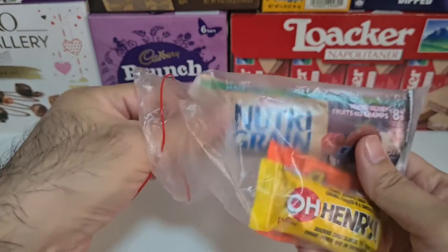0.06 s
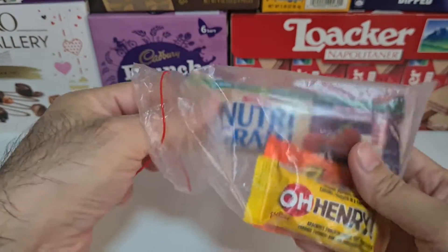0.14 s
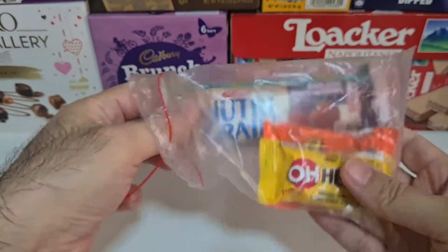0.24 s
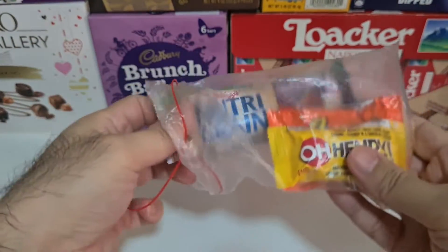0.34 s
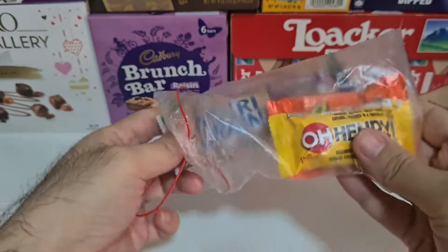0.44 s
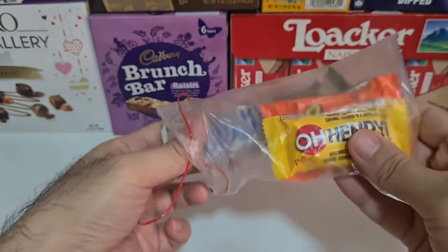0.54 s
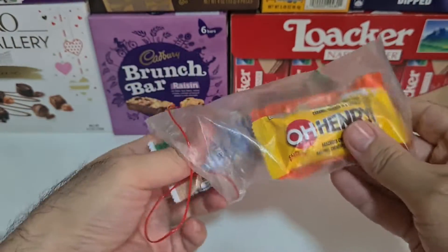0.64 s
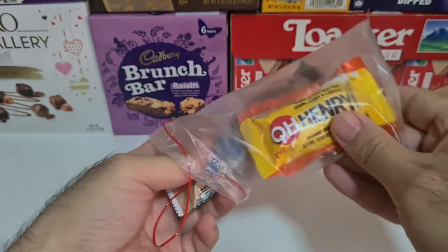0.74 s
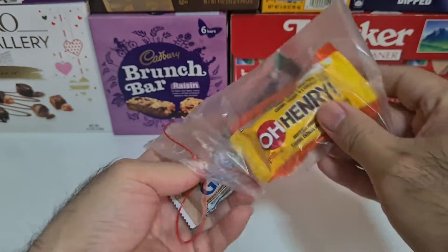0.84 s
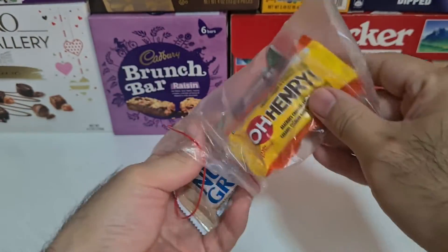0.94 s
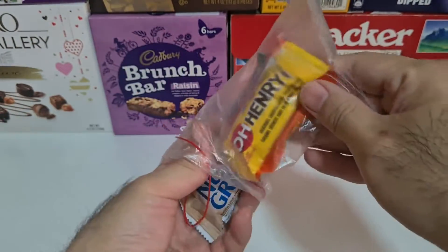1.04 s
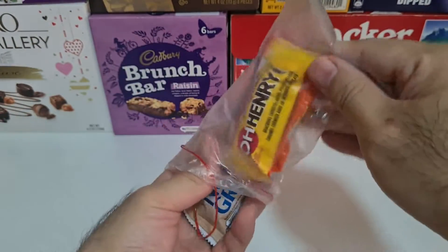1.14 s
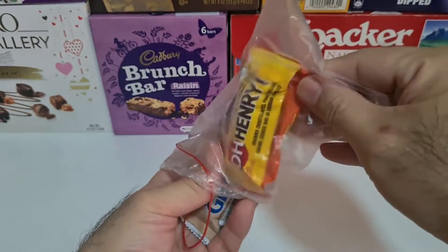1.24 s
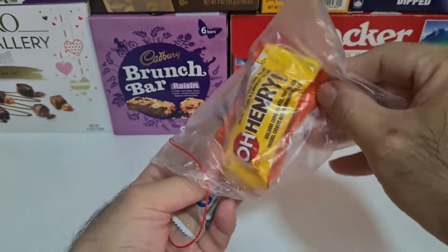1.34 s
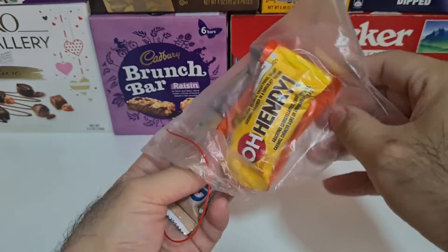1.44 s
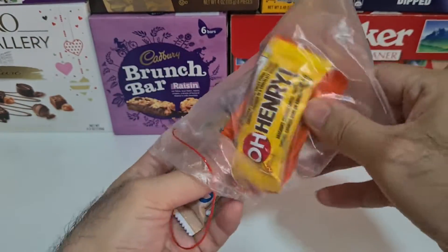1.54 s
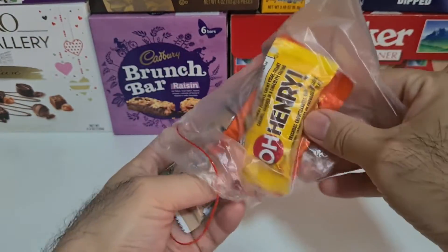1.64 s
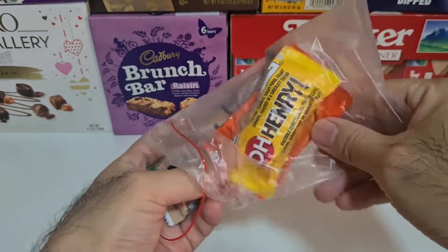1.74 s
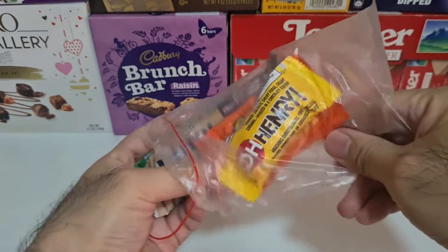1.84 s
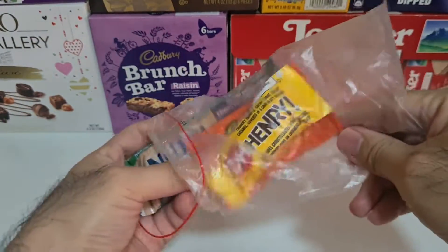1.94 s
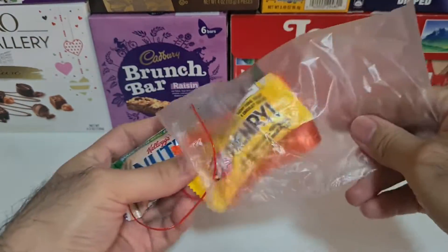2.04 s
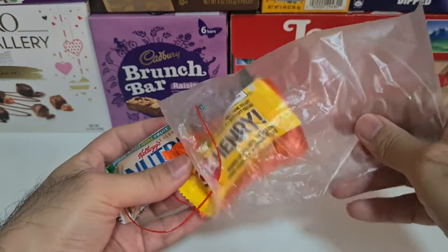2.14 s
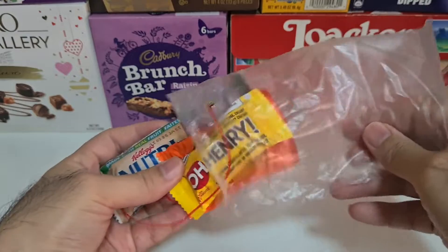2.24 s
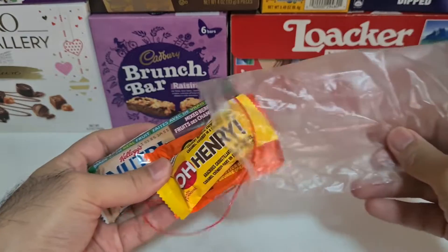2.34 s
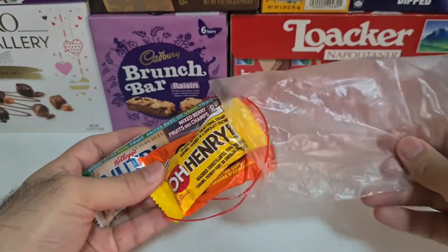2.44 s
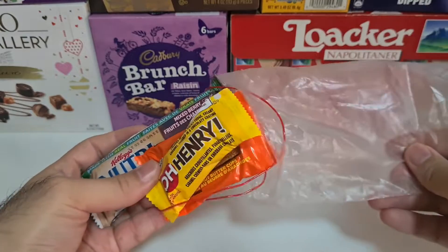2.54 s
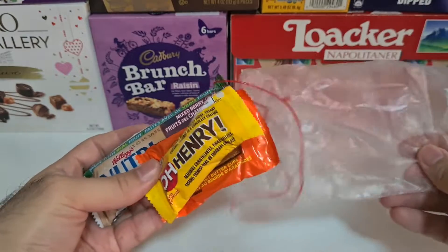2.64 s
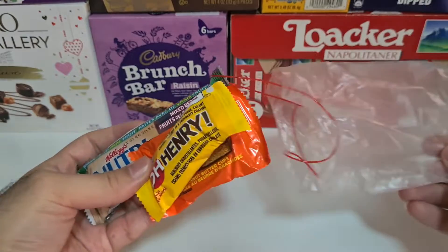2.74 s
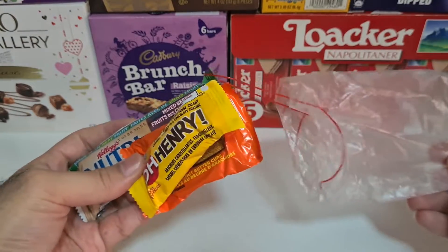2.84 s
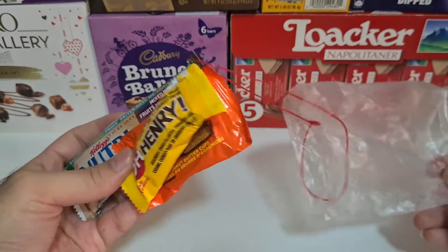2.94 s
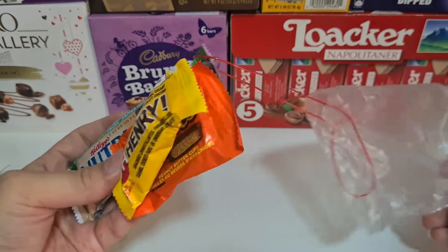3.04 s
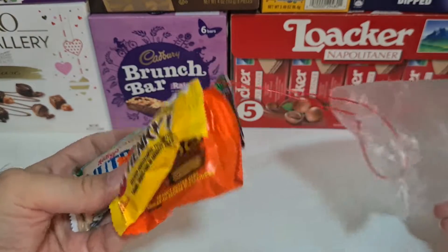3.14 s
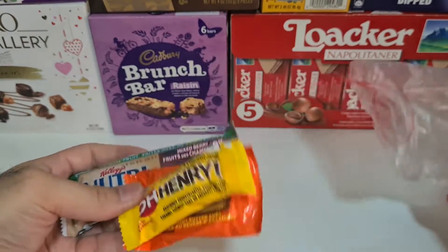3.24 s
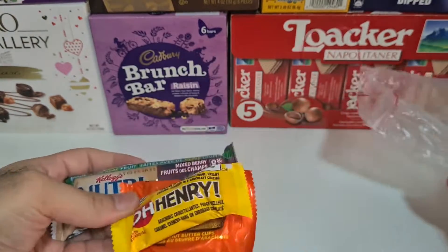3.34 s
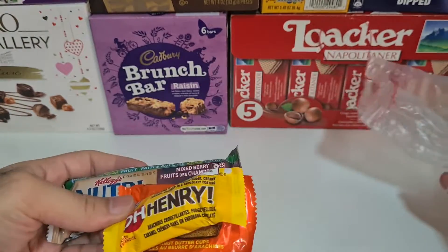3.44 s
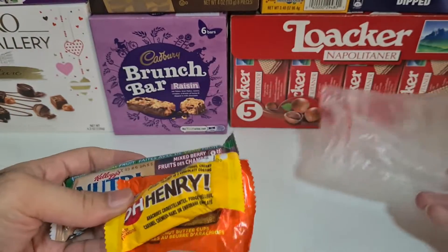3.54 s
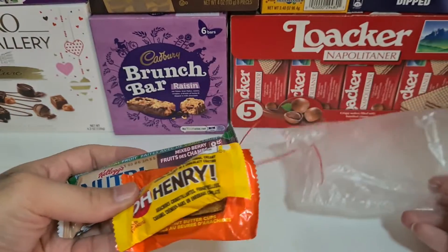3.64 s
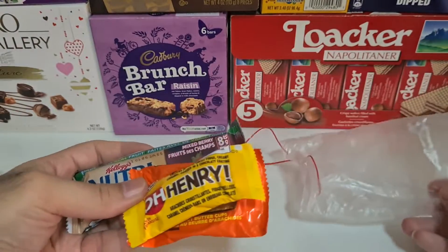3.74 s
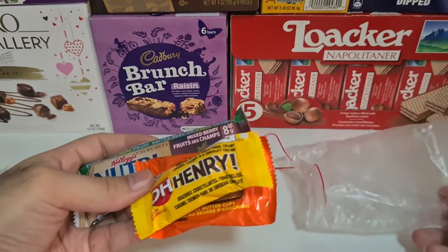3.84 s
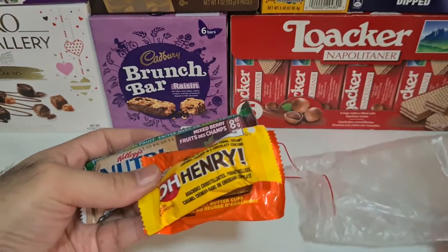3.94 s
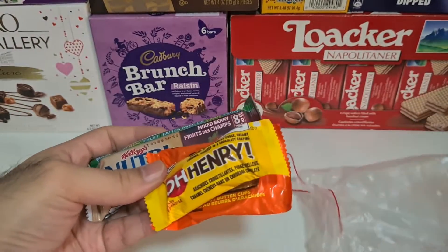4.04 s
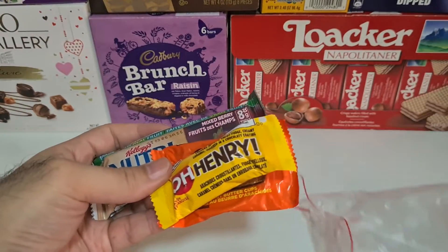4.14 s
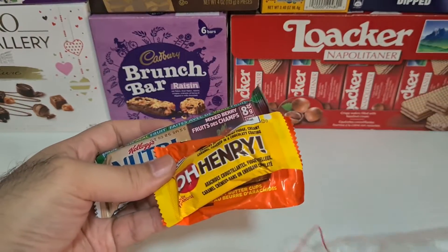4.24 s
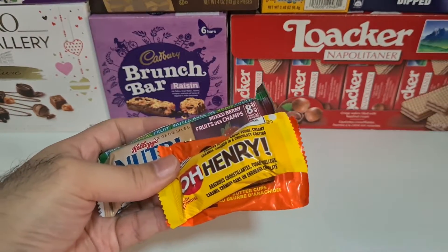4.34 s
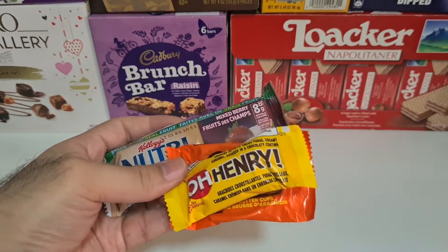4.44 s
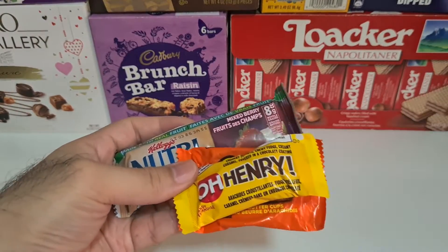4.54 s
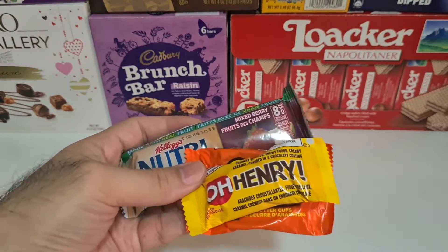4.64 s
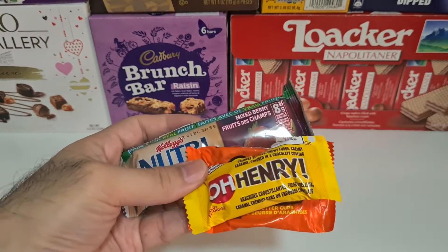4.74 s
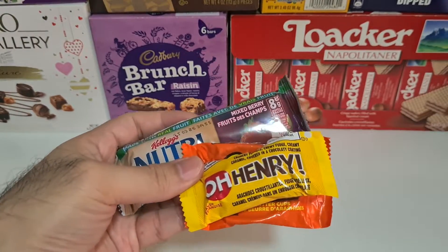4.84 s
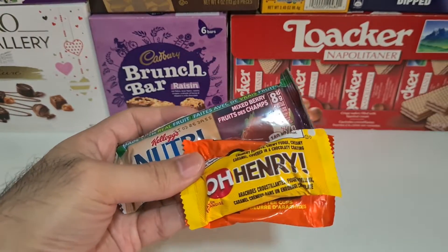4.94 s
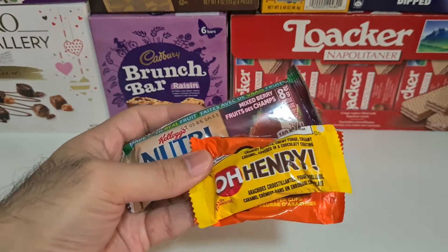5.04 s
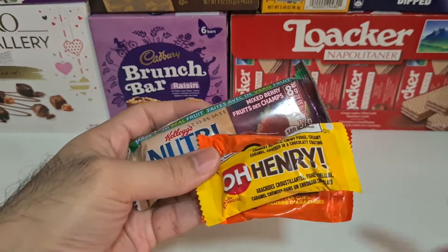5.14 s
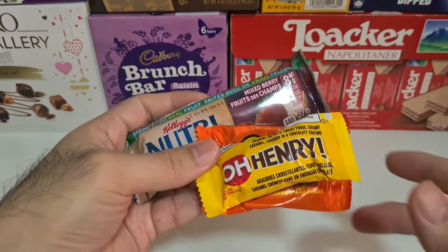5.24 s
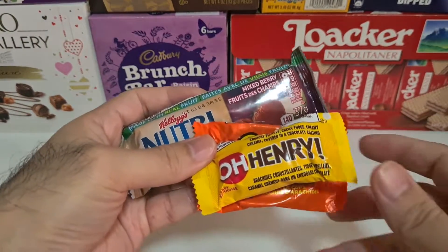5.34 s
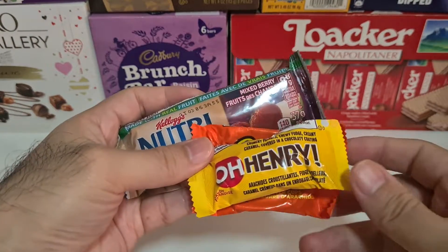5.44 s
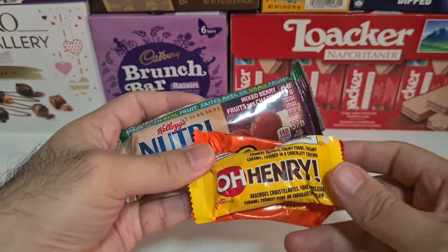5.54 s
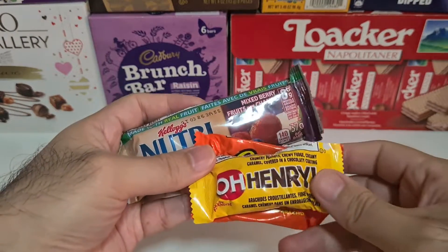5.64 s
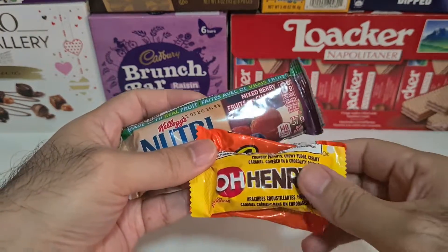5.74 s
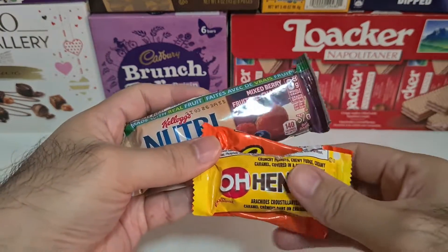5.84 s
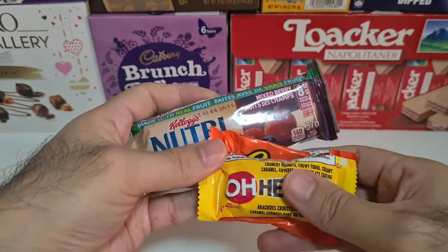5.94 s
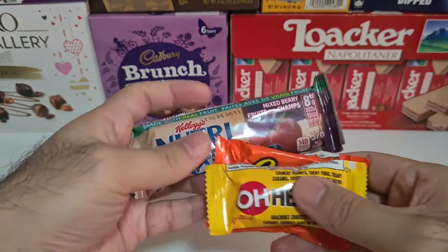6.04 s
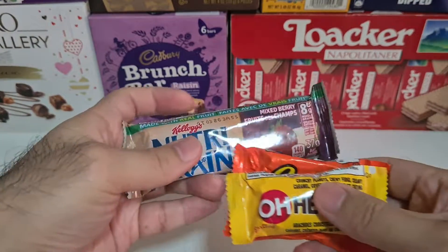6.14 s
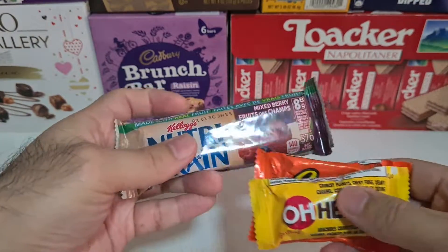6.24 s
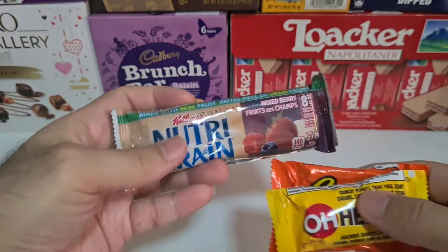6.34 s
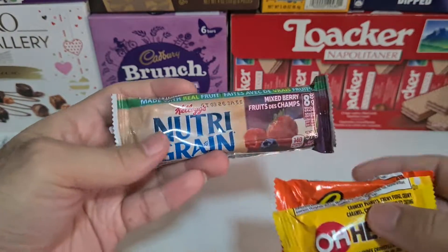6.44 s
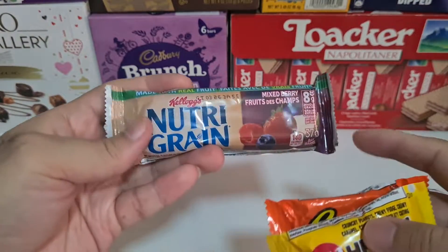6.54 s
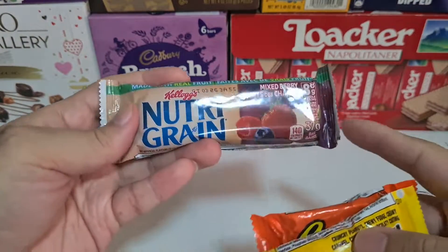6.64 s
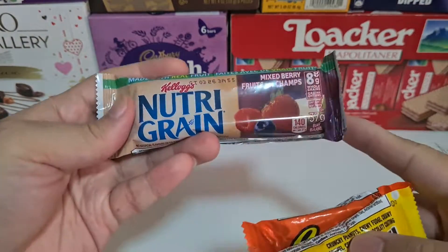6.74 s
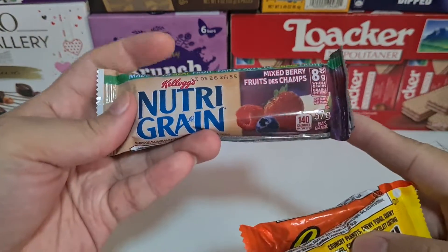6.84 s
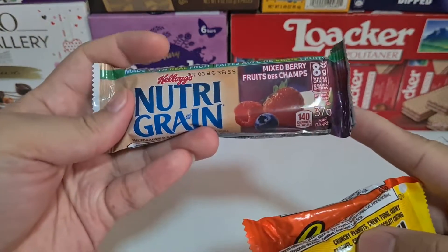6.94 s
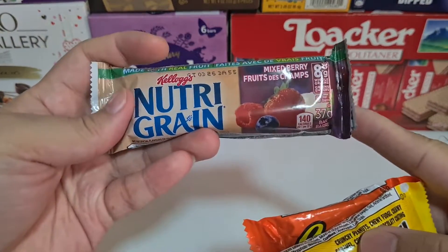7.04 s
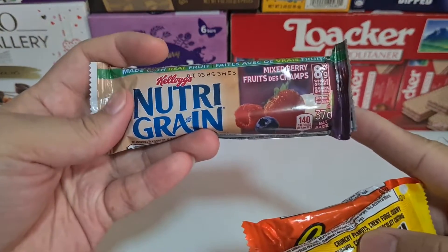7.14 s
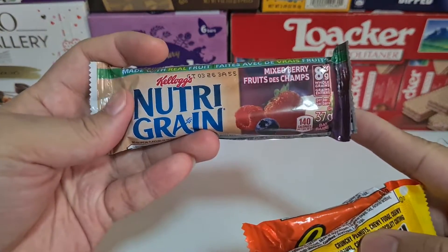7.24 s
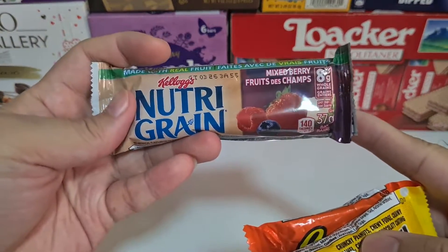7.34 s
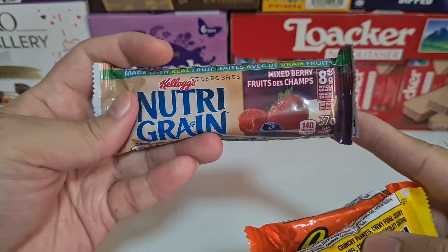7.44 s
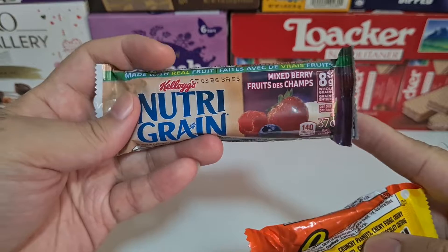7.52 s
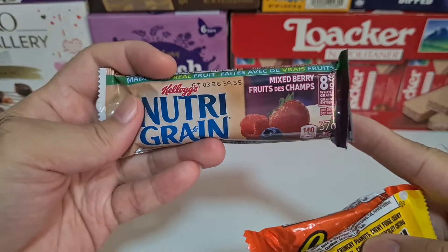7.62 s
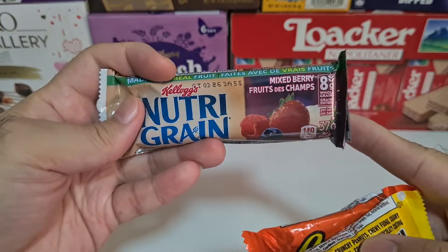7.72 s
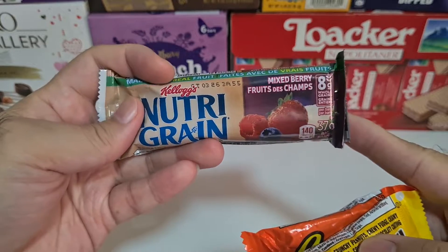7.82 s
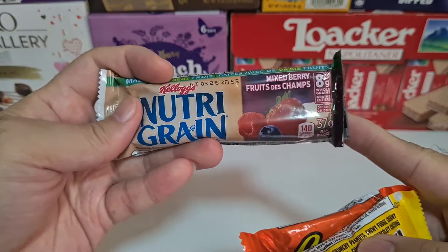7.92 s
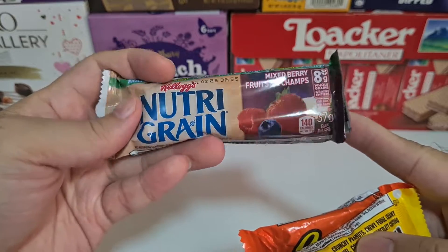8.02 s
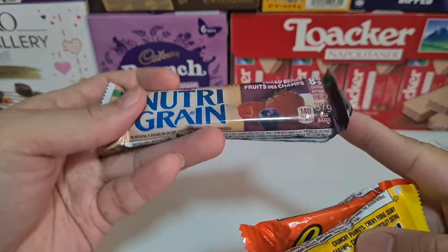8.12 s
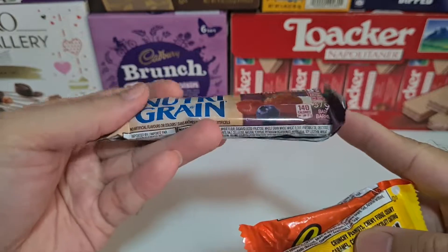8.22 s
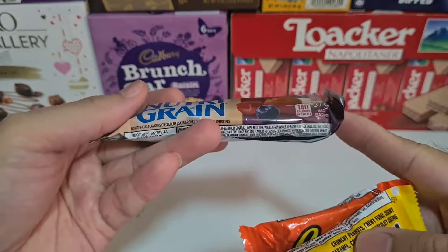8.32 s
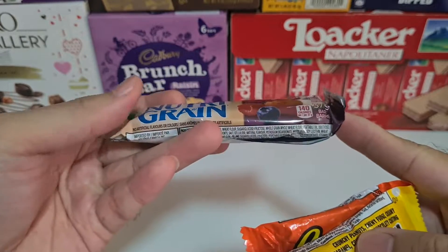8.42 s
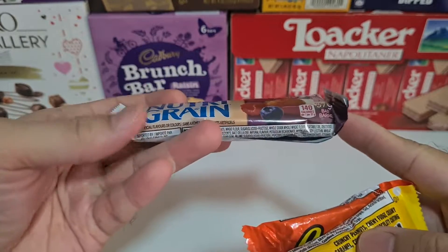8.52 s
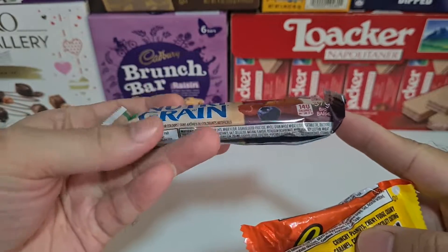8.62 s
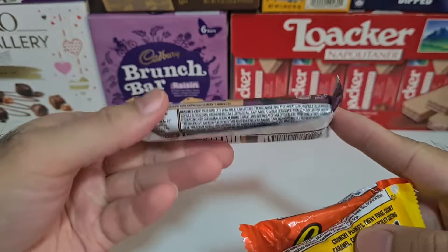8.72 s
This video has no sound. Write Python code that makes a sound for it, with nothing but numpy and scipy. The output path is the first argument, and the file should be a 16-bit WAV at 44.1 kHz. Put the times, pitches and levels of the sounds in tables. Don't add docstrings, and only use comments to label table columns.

```python
import sys
import numpy as np
from scipy import signal
from scipy.fft import rfft, irfft, next_fast_len
from scipy.io import wavfile
from scipy.ndimage import uniform_filter1d, map_coordinates

SR = 44100
rng = np.random.default_rng(int(sys.argv[2]) if len(sys.argv) > 2 else 0)


def unload_audio(sound):
    columns = np.transpose(np.atleast_2d(sound))
    steps = np.round(np.clip(columns, -1, 1) * 32767)
    wavfile.write(sys.argv[1], SR, steps.astype(np.int16))


def volts(x):
    e = np.asarray(x, float) / 20
    return 10 ** e


N = 387198


def along(points, hz):
    f, value = np.transpose(points)
    return np.interp(np.log(hz + 1), np.log(f + 1), value)


def wobble(rate, s):
    knots = rng.standard_normal(2000)
    return map_coordinates(knots, [s * rate])


# (frequency [Hz], likeness [0-1])
LIKENESS = [(60, .985), (260, .9), (600, .68), (1500, .72), (5500, .06)]


def paired(a, b, hz):
    turn = np.arccos(np.clip(along(LIKENESS, hz), 0, 1)) / 2
    shared, apart = np.cos(turn) * a, np.sin(turn) * b
    return np.array([shared + apart, shared - apart])


# (time [s], held [s], rustle level [dB], body [dB])
BAG_TUGS = [(0.0, 0.15, -36.5, -15), (.2, 0.018, -34, -18.5), (.29, 0.1, -38.5, -15),
            (.4, 0.029, -34.5, -18), (.48, 0.057, -40, -17), (.58, 0.024, -36, -18), (.65, .3, -37.5, -14),
            (0.948, 0.19, -35.5, -21), (1.2, .3, -37.5, -16), (1.6, 0.13, -32, -16),
            (1.78, 0.084, -35.5, -14), (1.866, 0.091, -34, -10), (2.03, 0.035, -33, -15),
            (2.16, 0.042, -39, -15), (2.27, 0.039, -38, -14), (2.373, 0.017, -32, -12),
            (2.48, 0.03, -43.5, -14), (2.57, 0.04, -35.5, -11.5), (2.69, 0.031, -37, -9),
            (2.8, .02, -41, -15), (2.98, 0.039, -40, -12.5), (3.11, 0.029, -39, -18), (3.2, 0.17, -50, -9),
            (3.388, 0.039, -41.5, -14.5), (3.55, .5, -62, -12), (4.1, .05, -61, -16),
            (4.18, 0.071, -53, -5), (4.27, .2, -63, -7), (4.53, 0.0061, -53, -12), (4.66, 0.13, -51.5, -7),
            (4.94, 0.0072, -55, 0)]
# (time [s], held [s], rustle level [dB], sheen [dB])
WRAPPER_SQUEEZES = [(5.42, .24, -61, -20), (5.682, 0.1, -48.5, -19), (5.8, .17, -67, 13),
                    (5.974, 0.01, -45, -19), (6.002, 0.14, -43, -14), (6.198, 0.0067, -47, -4),
                    (6.3, .22, -53, -4.5), (6.638, 0.028, -49, -8), (6.8, 0.1, -57.5, -2),
                    (7.55, .02, -57.5, -1), (7.64, 0.074, -57, 2), (7.92, 0.025, -64, 11),
                    (8.045, 0.018, -59, -1), (8.09, 0.12, -50, -10), (8.25, 0.053, -54.5, -14),
                    (8.449, 0.012, -49.5, -14), (8.65, 0.1, -43.5, -8)]


def hands(s):
    tug_rise_db_s, tug_fall_db_s, tug_sheen_db = 300, 159, -7.5
    squeeze_rise_db_s, squeeze_fall_db_s, squeeze_body_db = 904, 135, -13
    rest_db, rest_body_db, rest_sheen_db = -69, 0, -40.5

    start, held, db, colour_db = np.transpose(BAG_TUGS + WRAPPER_SQUEEZES)[..., None]
    bag = np.arange(len(start))[:, None] < len(BAG_TUGS)
    rise = np.where(bag, tug_rise_db_s, squeeze_rise_db_s)
    fall = np.where(bag, tug_fall_db_s, squeeze_fall_db_s)
    early = np.maximum(start - s, 0)
    late = np.maximum(s - start - held, 0)
    power = volts(db - rise * early - fall * late) ** 2
    rest = volts(rest_db) ** 2
    total = power.sum(0) + rest

    bodies_db = np.where(bag, colour_db, squeeze_body_db)
    sheens_db = np.where(bag, tug_sheen_db, colour_db)
    body_db = (np.sum(power * bodies_db, 0) + rest * rest_body_db) / total
    sheen_db = (np.sum(power * sheens_db, 0) + rest * rest_sheen_db) / total
    stiff = np.sum(power * ~bag, 0) / total
    return 10 * np.log10(total), body_db, sheen_db, stiff


def rustle(count, spread_db, clump_db):
    stiff_db = 2.2
    draw = rng.random((count, 4))
    slot = np.clip(np.arange(count) + 4 * draw[:, 0] - 2, 0, count)
    s = slot * (N - 1) / count / SR
    level_db, body_db, sheen_db, stiff = hands(s)

    chance_db = -(spread_db + stiff_db * stiff) * np.log(1 - .99 * draw[:, 1])
    size = volts(chance_db + clump_db * wobble(50, s))
    size /= np.sqrt(uniform_filter1d(size ** 2, size=40))
    db = level_db + 20 * np.log10(size) + 10 * np.log10(N / count) + 4.0

    drift = .17 * (1 - stiff / 2) * wobble(25, s)
    panel_hz = 1200 * 6 ** np.clip(.28 + drift + .5 * draw[:, 2], 0, 1)
    t60 = .003 + .011 * draw[:, 3] ** 2
    return buckles(s, db, panel_hz, body_db + 12.5, sheen_db + 5.5, t60, rise=0.0036, ring=1.3, creep_db=-3.5)


# (time [s], level [dB], panel [Hz])
BAG_FOLDS = [(0.022, -26, 3570), (0.0657, -18.5, 1500), (0.0776, -16.5, 3200), (0.1499, -15, 2600),
             (0.286, -29, 2226), (0.3375, -20, 7300), (0.4065, -19, 1920), (0.423, -24, 4650),
             (0.5175, -22, 6370), (0.6085, -17.5, 1340), (0.659, -22, 1890), (0.6995, -23, 6850),
             (0.82, -24, 2560), (0.8463, -33, 3830), (0.87, -19.5, 5000), (0.9806, -42, 2660),
             (1.122, -21.5, 3200), (1.375, -22, 1880), (1.5194, -23.5, 2830), (1.545, -23, 1940),
             (1.891, -14, 5680), (2.175, -21, 4500), (2.372, -11.5, 6500), (2.589, -29, 3040),
             (2.638, -33, 6240), (2.809, -25, 5240), (2.835, -25, 9700), (2.855, -26.5, 5300),
             (2.939, -33.5, 6550), (3.1102, -22.5, 2300),
             (0.047, -21.5, 1930), (0.1044, -35.5, 3200), (0.1327, -29.5, 2260), (0.177, -33.5, 3280),
               (0.196, -21, 3160), (0.2381, -21.5, 2640), (0.3107, -25, 2830), (0.391, -26.5, 6650),
               (0.4524, -21.5, 5760), (0.4923, -25, 1870), (0.5543, -25, 2760), (0.5941, -16, 6350),
               (0.6314, -28.5, 1890), (0.9145, -29, 4800), (0.973, -23, 2950), (1.0437, -26, 2030),
               (1.1076, -17, 2860), (1.1266, -20, 3130), (1.186, -23.5, 1273), (1.2336, -25, 1950),
               (1.275, -27, 1830), (1.2953, -23, 1310), (1.3194, -23.5, 2620), (1.4034, -18, 2680),
               (1.4412, -22, 3200), (1.476, -26, 3160), (1.5938, -20.5, 3180), (1.6764, -38, 2680),
               (1.8488, -15.5, 1900), (1.8616, -29, 3000), (1.9183, -20, 2870), (1.9567, -18.5, 4000),
               (1.9696, -19, 3300), (2.0207, -28.5, 2690), (2.1156, -28.5, 3610), (2.142, -28, 3980),
               (2.1957, -19.5, 2800), (2.2476, -26.5, 7140), (2.2714, -26, 1840), (2.357, -24, 6740),
               (2.4635, -31, 2840), (2.5225, -32, 3060), (2.557, -37.5, 1430), (2.6964, -21, 2880),
               (2.7787, -27, 6160), (2.902, -33.5, 3050), (2.9677, -35, 6040), (3.0559, -26, 4700),
               (3.4335, -23, 6330), (3.4722, -34, 6710), (3.4894, -41, 6890), (3.599, -44, 4160),
               (3.6556, -50, 1100), (3.6654, -52, 2180), (3.8314, -48, 1890), (3.8944, -50, 2010)]
# (time [s], level [dB], panel [Hz], sheen [dB])
LAY_DOWN_SNAPS = [(3.209, -36, 5770, 1), (3.228, -34.5, 4080, -2), (3.294, -25.5, 4350, -40),
                  (3.3036, -31.5, 6000, 2), (3.3212, -33, 3440, -10), (3.354, -36, 6590, -6),
                  (3.3768, -30, 3340, -17), (3.4413, -43, 6870, 2), (3.551, -50, 4870, -1),
                  (3.678, -48, 1240, -10), (3.717, -45, 5260, -1), (3.782, -43, 2670, -17.5),
                  (3.835, -49, 1940, -28), (3.901, -52, 3100, -9), (3.9826, -54, 6550, 3),
                  (4.173, -43, 6760, -6), (4.195, -50, 6120, 5), (4.262, -47, 4090, -5),
                  (4.509, -49, 6140, 4), (4.538, -45, 4000, -5), (4.55, -42, 4600, -29),
                  (4.62, -47, 3300, -20), (4.639, -45, 2240, -5), (4.6607, -44, 6590, 1),
                  (4.678, -46, 3050, -17), (4.725, -40, 5800, -12), (4.765, -40, 6000, -13),
                  (4.8, -50, 5500, -6), (4.851, -44, 3360, -3), (4.8703, -48.5, 1430, -18),
                  (4.918, -40, 4740, -2), (4.9406, -37.5, 3600, -16), (4.959, -37, 6400, -21),
                  (5.1305, -49, 4080, -20), (5.447, -49, 2480, -13)]
# (time [s], level [dB], panel [Hz], sheen [dB])
FINGER_SNAPS = [(5.6162, -42.5, 3520, -19), (5.6355, -44, 1380, -24), (5.6563, -38.5, 3480, -12),
                (5.6919, -33.5, 2720, -23), (5.6972, -40, 2860, -10), (5.709, -43, 6070, 0),
                (5.733, -39, 2250, -8), (5.762, -44.5, 4610, 0), (5.785, -46, 2970, -23),
                (5.9768, -43, 3680, -21), (5.999, -50, 2310, 11), (6.014, -42, 3000, -26),
                (6.043, -30, 2880, -25), (6.0607, -28.5, 3150, -19), (6.076, -36, 6120, -4.5),
                (6.089, -35, 3050, -11), (6.0984, -29, 7040, -8), (6.106, -29.5, 2670, -29),
                (6.1167, -32.5, 4620, -11.5), (6.1393, -36.5, 1180, -32), (6.178, -39, 6240, -27)]
# (time [s], level [dB], panel [Hz], sheen [dB])
PULL_APART_SNAPS = [(6.1934, -38, 6700, -8.5), (6.202, -26, 1930, -11), (6.2108, -30, 4570, -11),
                    (6.269, -22.5, 5730, 0), (6.287, -40, 1400, -25), (6.3266, -29.5, 1900, -28),
                    (6.3301, -25.5, 4440, -14), (6.366, -33, 3070, -6), (6.379, -35, 2010, -8),
                    (6.398, -35, 3600, -15), (6.4271, -26, 3260, -2.5), (6.4663, -18, 7600, -15),
                    (6.487, -29, 2900, -4.5), (6.531, -30, 5970, -11), (6.542, -42, 6000, -3),
                    (6.579, -38, 3660, -7), (6.6385, -30, 3940, -7), (6.647, -39, 4390, -10),
                    (6.658, -42, 2860, -1), (6.683, -38.5, 2060, -25), (6.698, -46, 5640, 7),
                    (6.7301, -28.5, 4130, -10), (6.798, -29, 3500, -8), (6.822, -25, 2940, -20),
                    (6.829, -29.5, 6160, -9), (6.865, -31.5, 4470, -7), (6.885, -35, 2820, -1),
                    (6.896, -32.5, 4100, -12)]
# (time [s], level [dB], panel [Hz], sheen [dB])
TILT_SNAPS = [(7.129, -52.5, 6070, -12), (7.275, -44.5, 2840, -15), (7.3703, -46.5, 2880, -50),
              (7.45, -45.5, 2780, -12), (7.552, -35.5, 6040, -7), (7.5624, -34.5, 4970, -5),
              (7.6231, -23.5, 5240, 1), (7.6297, -33, 6500, -13), (7.647, -24, 6460, -11),
              (7.6672, -20.5, 2750, -8.5), (7.7258, -40, 4470, -15), (7.763, -41, 6460, -31),
              (7.8434, -51, 2840, -1), (7.914, -39.5, 2820, -9), (7.94, -41.5, 2800, 1),
              (7.9477, -46, 3770, -5), (8.044, -34, 5840, -10), (8.054, -40, 3300, -5),
              (8.0847, -43, 1760, -5), (8.092, -33.5, 6450, -8), (8.103, -39, 5080, -10),
              (8.124, -25, 2750, -15), (8.1444, -29.5, 5600, -9), (8.1886, -27.5, 5030, -18),
              (8.2115, -38, 1960, -10), (8.2763, -36.5, 2860, -10)]
# (time [s], level [dB], panel [Hz], sheen [dB])
ROLL_OVER_SNAPS = [(8.446, -40.5, 3280, -14), (8.4747, -34, 6160, -13), (8.5001, -29, 4860, -13),
                   (8.6418, -26.5, 6360, -29), (8.661, -34.5, 6160, -14), (8.6874, -32, 3830, 3),
                   (8.6954, -29, 3600, -11), (8.706, -31.5, 3260, -4), (8.7183, -37, 6000, -5),
                   (8.733, -37, 3660, -7), (8.7412, -30, 4250, -13), (8.7436, -28.5, 1900, -9),
                   (8.7647, -33, 2780, -15)]


def snaps():
    s, db, hz = np.transpose(BAG_FOLDS)
    flat = np.zeros(len(s))
    folds = buckles(s - .0008, db + 14.5, hz, flat, flat - 1.5, flat + .018,
                    rise=0.00082, ring=2.2, creep_db=-5)

    events = LAY_DOWN_SNAPS + FINGER_SNAPS + PULL_APART_SNAPS + TILT_SNAPS + ROLL_OVER_SNAPS
    s, db, hz, sheen_db = np.transpose(events)
    t60 = np.full(len(s), .0075)
    body_db = -3 - 5 * np.log2(hz / 1500)
    sharp = buckles(s, db + 23, hz, body_db, sheen_db + 4, t60, rise=0.0045, ring=1.9, creep_db=-12)
    return folds + sharp


# (time [s], left-right level [dB], left delay [samples])
HAND_PLACE = [(0, 1.5, 1), (2.5, 1.5, -0.5), (3.2, 0, 8), (4.2, 0, 10.5), (5.099, -.4, 14), (5.6, 2, 0),
              (6.3, .3, 1), (6.7, 3.5, 2), (7.2, 2.5, -5.5), (7.8, .5, -0.5), (8.2, 3.5, -2.5),
              (8.78, 4, -3.5)]


def buckles(s, db, panel_hz, body_db, sheen_db, t60, rise, ring, creep_db):
    grain, creep_s = 512, .002
    t, hz = np.arange(grain) / SR, np.fft.rfftfreq(grain, 1 / SR)

    after = (t - creep_s) / t60[:, None]
    flip = volts(-60 * after)
    flutter = volts(-11 - 16 * after)
    creep = volts(creep_db) * np.exp((t - creep_s) / rise) * (t / creep_s)
    shape = np.where(t < creep_s, creep, flip + flutter) * np.cos(np.pi / 2 * t / t[-1])
    burst = rng.standard_normal((len(s), 2, grain)) * shape[:, None]
    burst /= np.linalg.norm(burst, axis=2)[..., None]

    centre = panel_hz[:, None]
    width = centre / 4
    panel = 1 + ring * 1j * hz * width / (centre ** 2 - hz ** 2 + 1j * hz * width)
    low = 1 / (1 + (hz / (centre / 4 + 600)) ** 4)
    high = 1 / (1 + (7500 / (hz + 1)) ** 8)
    slope = volts(body_db[:, None] * low + sheen_db[:, None] * high)

    when, pan_db, delay = np.transpose(HAND_PLACE)
    pan = np.interp(s, when, pan_db)[:, None]
    late = np.interp(s, when, delay)[:, None]
    lean = volts(pan / 2) * np.exp(-1j * np.pi * hz / SR * late)

    left_right = paired(*np.moveaxis(rfft(burst), 1, 0), hz)
    rows = irfft(left_right * panel * slope * [lean, 1 / lean], grain)
    rows *= (volts(db) / np.sqrt(np.mean(np.abs(panel) ** 2, 1)))[:, None]
    at = (np.round(s * SR).astype(int)[:, None] + np.arange(grain)).ravel()
    return np.array([np.bincount(at, side.ravel(), N + SR)[:N] for side in rows])


# (frequency [Hz], level [dB per Hz])
FILM_COLOUR = [(88, -36), (150, -5), (429, -6.5), (899, -5), (2300, -4), (5200, -4.5), (8000, -5.5),
               (15700, -2.5)]
# (frequency [Hz], width [Hz], lift [dB])
CORNER_RESONANCES = [(614, 170, 5.5), (1310, 183, 5.5), (1660, 215, -4), (1884, 190, 6), (2360, 220, -1),
                     (2870, 200, 4.5), (3200, 120, 2.5), (4000, 910, 1), (6390, 1100, 5), (11600, 2400, 2)]


def coloured(x):
    m = next_fast_len(N + SR // 2)
    hz = np.fft.rfftfreq(m, 1 / SR)
    lift_db = sum(db / (1 + (2 * (hz - c) / w) ** 2) for c, w, db in CORNER_RESONANCES)
    cepstrum = irfft(np.log(volts(along(FILM_COLOUR, hz) + lift_db) + 1e-6), m)
    cepstrum[1:m // 2] *= 2
    cepstrum[m // 2 + 1:] = 0
    return irfft(rfft(x, m) * np.exp(rfft(cepstrum)), m)[..., :N]


# (time [s], length [s], level [dB], centre [Hz], width [Hz])
THUMB_SLIDE = (5.55, 0.6, -65, 6200, 700)


def slide():
    start, length, db, centre_hz, width_hz = THUMB_SLIDE
    hz, s = np.fft.rfftfreq(N, 1 / SR), np.arange(N) / SR
    band = 1 / (1 + (2 * (hz - centre_hz) / width_hz) ** 2)
    hiss = irfft(rfft(rng.standard_normal((2, N))) * band, N)
    swell = np.sin(np.pi * np.clip((s - start) / length, 0, 1))
    return volts(db) * hiss / hiss.std() * swell


# (time [s], peak level [dB], frequency [Hz])
TABLE_KNOCKS = [
    (1.88, -46, 99.8),
    (5.443, -35.5, 57.8),
]


def thuds():
    start, db, hz = np.transpose(TABLE_KNOCKS)[..., None]
    t = np.maximum(np.arange(N) / SR - start, 0)
    push = volts(-60 * t / .45) * (1 - np.exp(-t / .02))
    return np.sum(volts(db) * push * np.sin(2 * np.pi * hz * t), 0)


# (frequency [Hz], t60 [s])
ROOM_DECAY = [(300, 0.06), (3000, 0.19), (12000, 0.12)]


def room(x, count):
    hz, t, z = signal.stft(rng.standard_normal((2, count, SR // 3)), SR, nperseg=256)
    decay = volts(-60 * t / along(ROOM_DECAY, hz)[:, None])
    tails = signal.istft(paired(*z, hz[:, None]) * decay, SR, nperseg=256)[1]
    place = np.arange(N) * 8 // SR % count
    wet = 0
    for k in range(count):
        tail = tails[:, k] / np.linalg.norm(tails[:, k])
        wet = wet + signal.fftconvolve((x.sum(0) * (place == k))[None], tail, axes=1)
    return np.pad(wet, ((0, 0), (200, 0)))[:, :N]


# (frequency [Hz], width [Hz], level [dB])
FAN_TONES = [(183, 12, -76), (2175, 25, -79.5)]


def whine():
    s = np.arange(N) / SR
    return sum(volts(db) * (1 + wobble(width_hz, s)) * np.sin(2 * np.pi * hz * s)
               for hz, width_hz, db in FAN_TONES)


# (time [s], level [dB])
HUM_LEVEL = [
    (0.0, -52.5),
    (1.69, -52.5),
    (5.38, -54.5),
    (5.48, -46.5),
    (5.62, -54),
    (8.78, -55),
]
# (frequency [Hz], level [dB per Hz])
AIR_COLOUR = [(15, -34.5), (25, -10.5), (78, 0.5), (140, -19.5), (194, -25), (234, -28), (324, -21.5),
              (555, -20.5), (977, -26.5), (2140, -31), (2440, -35.5), (6630, -47), (8220, -52),
              (15700, -52.5)]


def air():
    hz, s = np.fft.rfftfreq(N, 1 / SR), np.arange(N) / SR
    a, b = rfft(rng.standard_normal((2, N))) * volts(along(AIR_COLOUR, hz))
    both = paired(a, b, hz) / np.sqrt(np.mean(irfft(a, N) ** 2))
    bass = 1 / (1 + (hz / 118) ** 8)
    when, hum_db = np.transpose(HUM_LEVEL)
    swell = volts(np.interp(s, when, hum_db - np.median(hum_db)))
    hum, hiss = irfft(both * bass, N), irfft(both * (1 - bass), N)
    return volts(-54 + 1.54) * (swell * hum + hiss)


def scene():
    film = coloured(rustle(count=6000, spread_db=1.6, clump_db=1.6) + snaps())
    wet = volts(-14) * room(film, count=5)
    return film + wet + slide() + thuds() + whine() + air()


def roll_off(x):
    return signal.sosfilt(signal.butter(12, 16990, fs=SR, output="sos"), x)


# (frequency [Hz], left-right level [dB])
MIC_TILT = [(60, -3), (240, -2.7), (950, -1.5), (3770, -1.5), (15000, -6)]


def record(dry):
    top_hz, low_hz = 15950, 36
    hz = np.fft.rfftfreq(N, 1 / SR)
    tilt_db = along(MIC_TILT, hz)
    treble_edge = np.clip((top_hz - hz) / 250 + .5, 0, 1) ** 2
    bass_edge = 1 / (1 + (low_hz / (hz + 1)) ** 6)
    mics = volts([tilt_db / 2, -tilt_db / 2]) * treble_edge * bass_edge
    mix = irfft(rfft(dry) * mics, N)
    return roll_off(mix)


dry = scene()
out = record(dry)
unload_audio(out)
```